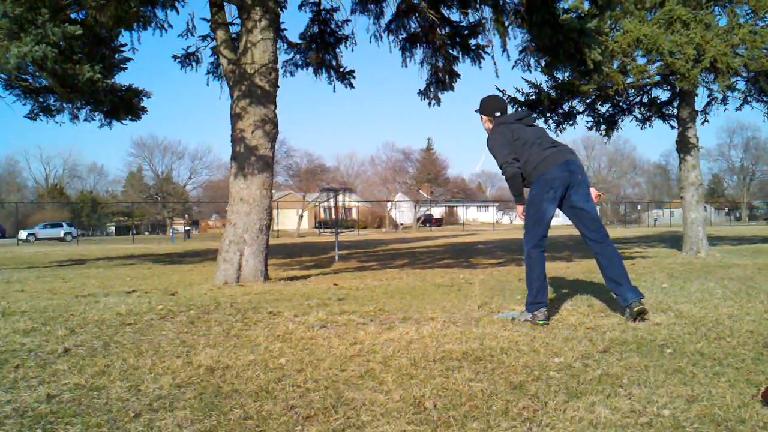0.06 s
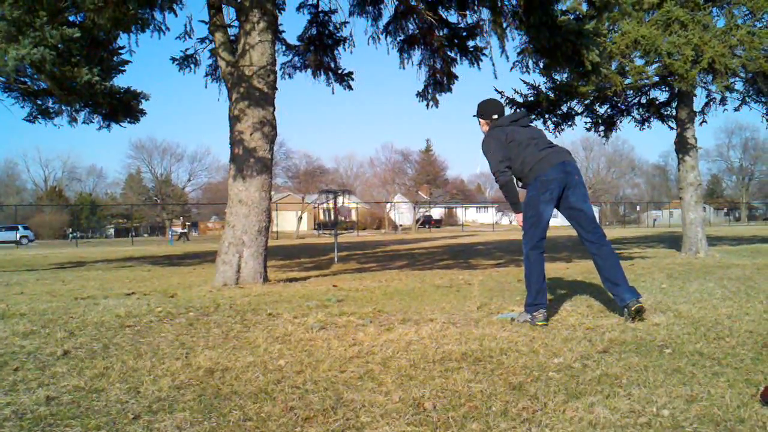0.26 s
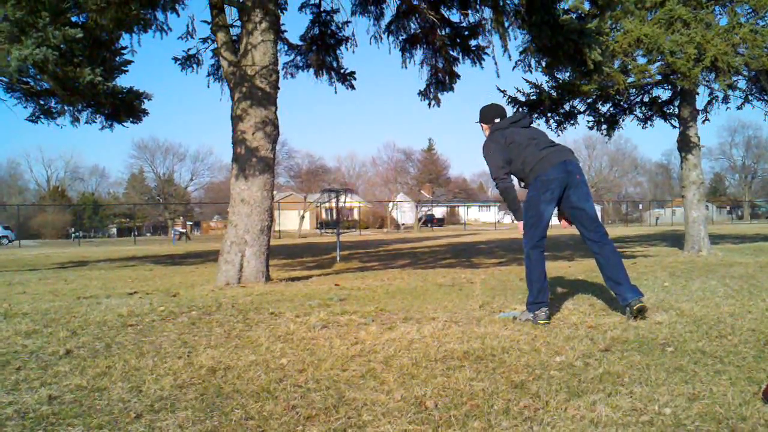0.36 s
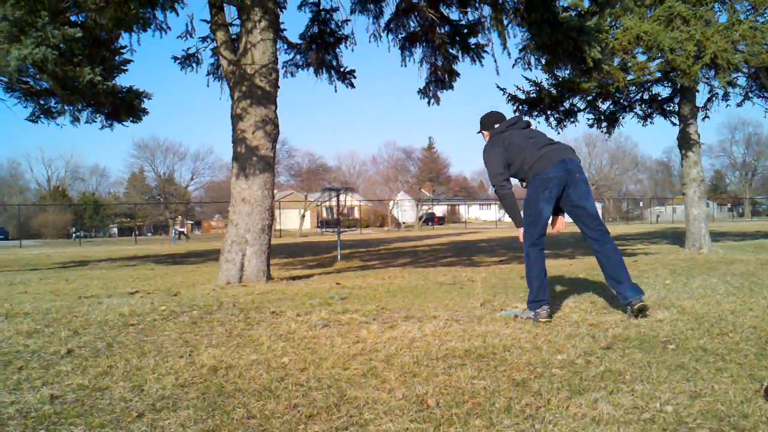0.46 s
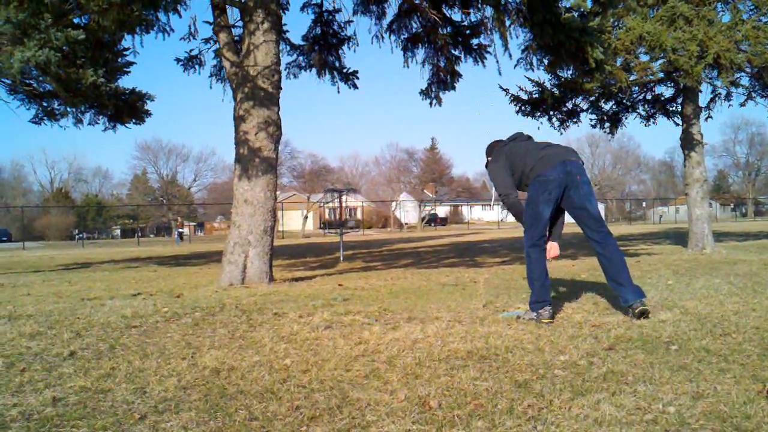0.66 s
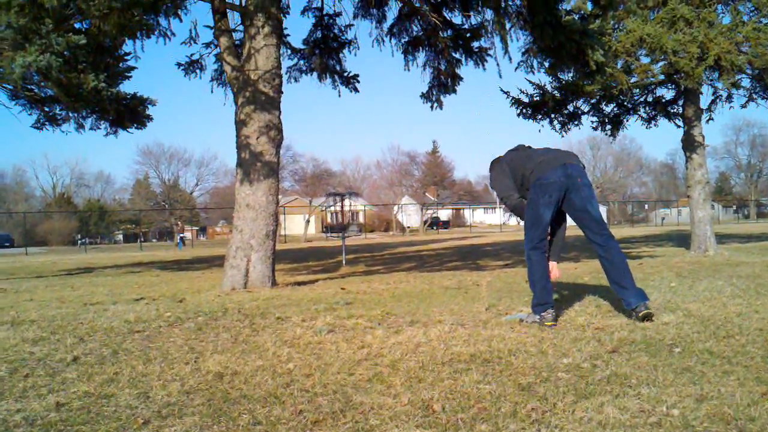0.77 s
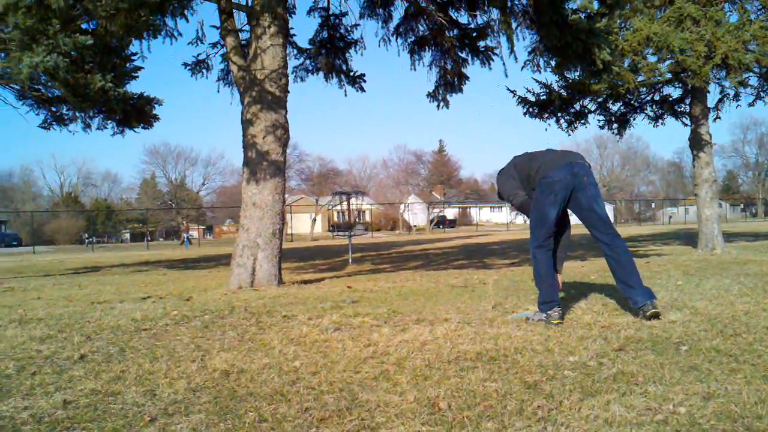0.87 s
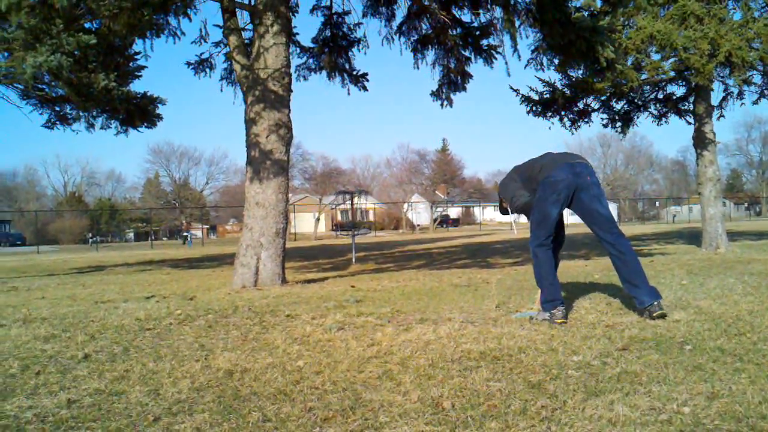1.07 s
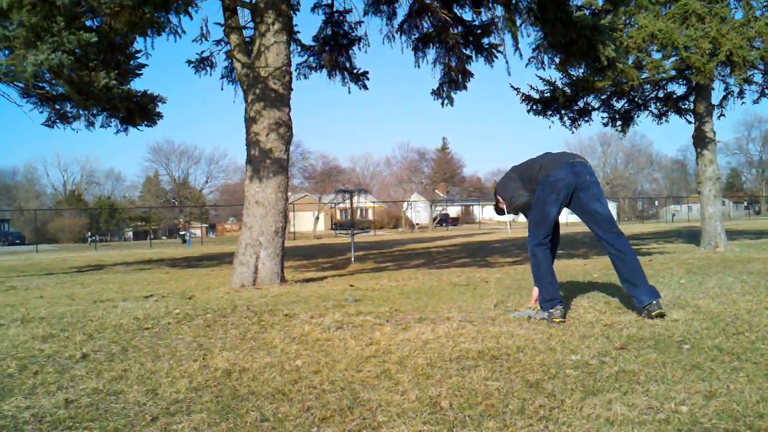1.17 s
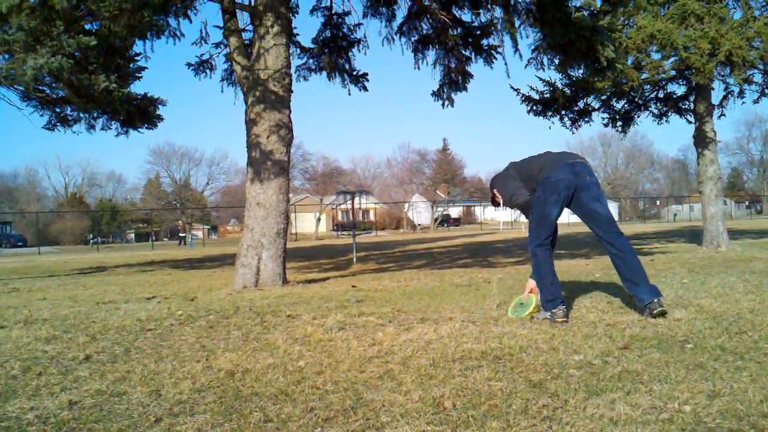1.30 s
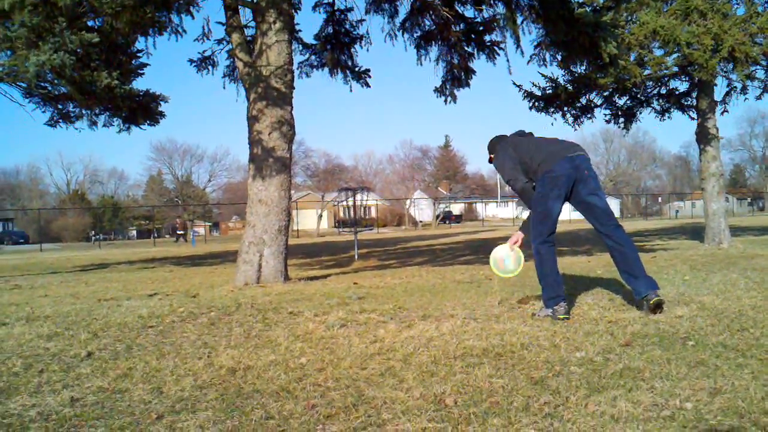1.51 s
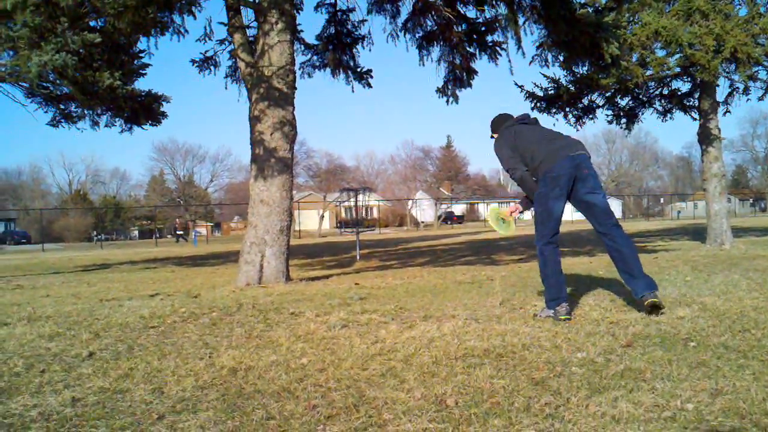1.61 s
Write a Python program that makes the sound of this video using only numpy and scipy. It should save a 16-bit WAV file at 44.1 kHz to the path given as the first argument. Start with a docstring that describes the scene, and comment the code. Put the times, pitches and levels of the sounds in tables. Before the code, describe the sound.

A plastic disc hits metal basket chains with a bright, fading jingle.

```python
"""Disc into a chain basket

An open park, with the basket in front of a stereo microphone. A putted plastic disc hits the hanging
chains and drops into the tray. The steel links clash and ring very high, in surges that die away as
the chains swing out; the basket's wires sing one clear note. Far traffic, low wind, a few dull thumps
and one footfall on the grass lie underneath."""
import sys
import numpy as np
from scipy import signal
from scipy.fft import rfft, irfft
from scipy.io import wavfile

SR = 44100
rng = np.random.default_rng(int(sys.argv[2]) if len(sys.argv) > 2 else 0)


def unload_audio(sound):
    """Save the sound as a 16-bit wav file, at the path given as the first command line argument."""
    columns = np.transpose(np.atleast_2d(sound))
    # keep every value between -1 and 1, then stretch to whole-number steps
    steps = np.round(np.clip(columns, -1, 1) * 32767)
    wavfile.write(sys.argv[1], SR, steps.astype(np.int16))


N = 72765
TIME = np.arange(N) / SR

# far traffic: frequency_hz, density_db_per_hz
TRAFFIC_SPECTRUM = [(200, -95), (480, -86.5), (720, -86), (900, -76), (1060, -83), (1250, -78.5),
                    (1550, -88.5), (1900, -85.5), (2300, -105), (3400, -100), (5200, -110), (14000, -111)]
# its slow swell: time_s, gain_db
TRAFFIC_SWELL = [(0, -3.5), (0.5, -1), (0.9, -0.2), (1.2, 0), (1.4, -0.6), (1.65, -2.7)]
# wind rumble: frequency_hz, density_db_per_hz
RUMBLE_SPECTRUM = [(20, -65), (42, -63), (70, -67), (120, -54), (170, -74.5), (260, -94), (500, -105)]
# gusts in the rumble: time_s, gain_db
GUSTS = [(0, -19), (0.3, -16.5), (0.7, -17.5), (0.93, -16.5), (1.08, -9), (1.2, -5.5), (1.36, -11),
         (1.5, -9), (1.65, -5.5)]
# breeze on either side of the microphone: frequency_hz, left_db_per_hz, right_db_per_hz
BREEZE_SPECTRUM = [(31.2, -106, -123), (73, -91.5, -80), (144, -74.5, -79.5), (208.5, -73.5, -79.5),
                   (317, -81, -86), (660, -81, -89.5), (900, -93, -118), (1250, -100.5, -100),
                   (1998, -88.5, -93.5), (2500, -105, -105), (3380, -102, -102), (4440, -110, -110),
                   (14000, -110, -110)]
# a soft footfall on grass: frequency_hz, density_db_per_hz
FOOTFALL_SPECTRUM = [(90, -84), (230, -67), (400, -75), (800, -80), (1500, -100), (3300, -95), (6000, -108),
                     (14000, -118)]
# soft low thumps: start_s, level_db, pitch_hz
THUMPS = [(0.796, -42, 110), (0.921, -42, 235), (1.158, -39, 174), (1.228, -39.5, 124), (1.478, -30, 135),
          (1.548, -33, 96)]
# modes of the basket's wires: pitch_hz, gain_db, t60_s
BASKET_MODES = [(4360, 0, .165), (4315, -17, .07), (4440, -15, .07), (4530, -19, .05)]
# chains and disc rub the wires: start_s, level_db, length_s
BASKET_RUBS = [(0.262, -46, .012), (0.281, -45, .012), (0.319, -38, .011), (0.37, -54, .02),
               (0.43, -54, .02), (0.475, -55, .02), (0.52, -56, .02), (0.585, -55, .012),
               (0.639, -36, .019), (0.73, -56, .02), (0.785, -56, .02), (1.108, -65, .018),
               (1.318, -66, .02)]
# steady jingle of the swinging chains: time_s, ring_db, clash_db
CHAIN_SWING = [(0.236, -99, -98), (0.25, -35.5, -41), (0.335, -30.5, -46.5), (0.395, -48, -53),
               (0.47, -40.5, -56), (0.54, -45, -59), (0.63, -50.5, -64), (0.68, -42.5, -53.5),
               (0.785, -41, -52.5), (0.88, -60, -63.5), (1.11, -68, -78), (1.24, -64.5, -76.5),
               (1.38, -56.5, -60.5), (1.52, -78, -88), (1.65, -59, -88)]
# strands swing into each other: start_s, ring_db, clash_db, hold_s, t60_s
CHAIN_SURGES = [(0.243, -31, -41, 0.0026, 0.014), (0.261, -37, -49, 0.014, 0.12),
                (0.292, -29, -61, 0.0033, 0.061), (0.324, -45, -69, .010, .09),
                (0.42, -39, -52, 0.0079, 0.038), (0.562, -44, -56.5, 0.021, 0.24),
                (0.634, -36.5, -51, 0.023, 0.08), (0.721, -42, -66, 0.02, 0.15),
                (0.816, -46, -77, 0.037, 0.15), (0.9, -49, -69, 0.0058, 0.079),
                (0.925, -48, -88, 0.01, 0.043), (0.97, -48, -75, 0.0058, 0.052),
                (0.996, -52.5, -76, 0.004, 0.18), (1.042, -49, -86, 0.012, 0.11),
                (1.082, -49, -64.5, 0.012, 0.18), (1.169, -51.5, -66, 0.0074, 0.081),
                (1.286, -54, -87, 0.026, .10), (1.309, -46.5, -77, 0.024, 0.13),
                (1.326, -82, -60, 0.03, 0.12), (1.46, -56, -79, .006, 0.06), (1.61, -61.5, -88, .015, .15)]
# colour of steel touching steel: frequency_hz, gain_db
CLASH_SPECTRUM = [(500, 0), (1300, 10.5), (2000, -2.5), (3400, -0.5), (4000, -2), (4500, 1), (5100, -2),
                  (6400, -4.5), (7500, 2.5), (8600, -2.5), (9700, -12), (10550, 5.5), (11300, -16),
                  (14000, -42)]
# band in which the many links ring: frequency_hz, gain_db
LINK_BAND = [(11800, -18), (12100, -3.5), (12400, -1.5), (12600, -1.5), (12800, -1), (13050, -1),
             (13280, -7), (13500, -5), (13750, -2), (13930, -2)]
# links that hang free and ring longer: pitch_hz, gain_db, t60_s
FREE_LINK_MODES = [(12134, 0, .35), (12225, -7, .25), (13154, -2, .25), (13620, -3, .15), (13790, 2, .18),
                   (13910, 4, .18)]
# single links ring out: start_s, level_db, pitch_hz, t60_s
CLINKS = [(0.304, -28, 12134, .06), (0.325, -29, 13790, .035), (0.425, -40, 13760, .07),
          (0.462, -40, 12900, .07), (0.637, -38, 12134, .08), (0.726, -39, 13900, .06),
          (0.75, -43, 12134, .12), (0.84, -44, 13620, .07), (0.93, -48, 13900, .09),
          (0.975, -48, 13200, .06), (1.052, -47, 13910, .07), (1.092, -46, 13830, .08),
          (1.325, -44, 13910, .09)]
# strands slap the steel: start_s, level_db
SLAPS = [(0.2415, -41), (0.2455, -34), (0.2505, -35), (0.260, -35), (0.2935, -40), (0.3255, -39),
         (0.329, -38), (0.334, -35), (0.3485, -40), (0.4404, -44), (0.5027, -47), (0.637, -45),
         (1.374, -47)]
# colour of a slap: frequency_hz, gain_db
SLAP_SPECTRUM = [(2000, -25), (3300, -4), (4400, 1), (5200, -7), (6500, -2), (9000, -5), (14000, -20)]
# modes of the plastic disc: pitch_hz, gain_db, t60_s
DISC_MODES = [(1274, -12, .022), (1423, -11, .028), (1548, -17, .07), (3210, -7, .013), (3600, -9, .0044)]
# the disc lands on chains and basket: start_s, knock_db, crack_db
DISC_BLOWS = [(0.2452, -21.5, -14), (0.2512, -38, -20), (0.2625, -30, -34), (0.3475, -39, -48),
              (0.3685, -36, -50), (0.6365, -50, -40)]


def from_db(db):
    """Decibels to gain."""
    return 10 ** (np.asarray(db) / 20)


def decay(age, t60):
    """Full level until age 0, then a fall of 60 dB every t60 seconds."""
    return from_db(-60 * np.maximum(age, 0) / t60)


def gain_curves(rows):
    """A gain for every sample, from each dB column of a timed table."""
    times, *columns = np.transpose(rows)
    return from_db([np.interp(TIME, times, column) for column in columns])


def db_at(spectrum, hz, column=1):
    """A spectrum read on a log-frequency axis."""
    points = np.array(spectrum)
    return np.interp(np.log(hz + 1), np.log(points[:, 0]), points[:, column])


def bins():
    """Frequencies of the padded spectrum."""
    return np.arange(N + 1) * SR / (2 * N)


def filtered(x, gain):
    """Filter by a gain for every frequency."""
    return irfft(rfft(x, 2 * N) * gain)[..., :N]


def noise(spectrum, column=1):
    """Noise with a spectrum in dB per Hz."""
    white = rng.standard_normal(N) * np.sqrt(SR / 2)
    return filtered(white, from_db(db_at(spectrum, bins(), column)))


def ring(drive, hz, t60):
    """One mode; a unit click leaves a dying sine of height 1."""
    radius, angle = from_db(-60 / (t60 * SR)), 2 * np.pi * hz / SR
    return signal.lfilter([0, np.sin(angle)], [1, -2 * radius * np.cos(angle), radius ** 2], drive + 1e-18)


def contacts(per_s, spread_db=2.5):
    """Steel touches steel in random clicks of uneven size; rms 1."""
    sizes = from_db(spread_db * np.minimum(rng.exponential(1, N), 4)) * rng.choice([-1, 1], N)
    clicks = sizes * (rng.random(N) < per_s / SR)
    return clicks / (clicks.std() + 1e-9)


def jostle(depth_db=4, per_s=35):
    """A link is jostled now more, now less: a wandering gain of rms 1."""
    knots = np.minimum(rng.standard_normal(int(N / SR * per_s) + 2), 1.5)
    gain = from_db(depth_db * np.interp(TIME * per_s, np.arange(len(knots)), knots))
    return gain / np.sqrt(np.mean(gain ** 2))


def jingle(modes, effort, per_s):
    """Every mode is struck by its own contacts; the rms follows the effort."""
    out, power = 0, 0
    for hz, db, t60 in modes:
        unit_gain = np.sqrt(4 * np.log(1000) / (t60 * SR))
        drive = effort * jostle() * contacts(per_s)
        out += from_db(db) * unit_gain * ring(drive, hz, t60)
        power += from_db(db) ** 2
    return out / np.sqrt(power)


def outdoors(x, scatter_db, t60=.026):
    """Direct sound reaches the microphone with a short scatter of echoes, different on each side."""
    tail = rng.standard_normal((2, N // 8)) * decay(TIME[:N // 8], t60)
    tail /= np.sqrt(np.sum(tail ** 2, axis=1, keepdims=True))
    echoes = signal.fftconvolve(x[None], tail)[:, :N]
    wet = from_db(scatter_db)
    return (x + wet * echoes) / np.sqrt(1 + wet ** 2)


def traffic():
    """Far traffic swells and eases."""
    return gain_curves(TRAFFIC_SWELL) * noise(TRAFFIC_SPECTRUM)


def wind():
    """A gusting rumble, with a separate light breeze on each side of the microphone."""
    rumble = gain_curves(GUSTS) * noise(RUMBLE_SPECTRUM)
    breeze = np.array([noise(BREEZE_SPECTRUM, column) for column in (1, 2)])
    return rumble + breeze


def footfall(peak_s=.926, width_s=.014):
    """One soft step scuffs the grass, off to the left."""
    swell = np.exp(-.5 * ((TIME - peak_s) / width_s) ** 2)
    return swell * noise(FOOTFALL_SPECTRUM) * from_db([[3], [-5]])


def thumps(rise_s=.0045):
    """Dull bumps of a few cycles each."""
    out = np.zeros(N)
    for start, db, hz in THUMPS:
        age = np.maximum(TIME - start, 0)
        envelope = age / rise_s * np.exp(1 - age / rise_s)
        out += from_db(db) * envelope * np.sin(2 * np.pi * hz * age)
    return out


def basket(effort, sympathy_db=-9, pan_db=3.5):
    """Just left of centre, rubbed wires swell and ring out; the clatter keeps them faintly alive."""
    wires = from_db(sympathy_db) * jingle(BASKET_MODES, effort, per_s=210)
    for start, db, length in BASKET_RUBS:
        age = TIME - start
        for hz, mode_db, t60 in BASKET_MODES:
            envelope = from_db(db + mode_db) * np.clip(age / length, 0, 1) * decay(age - length, t60)
            wires += np.sqrt(2) * envelope * np.sin(2 * np.pi * (hz * age + rng.random()))
    return outdoors(wires, scatter_db=-15) * from_db([[pan_db / 2], [-pan_db / 2]])


def chain_motion(rise_s=.004):
    """Strength of ringing and of clashing: the swing plus surges that rise, hold and die."""
    power = gain_curves(CHAIN_SWING) ** 2
    for start, ring_db, clash_db, hold, t60 in CHAIN_SURGES:
        age = TIME - start
        envelope = np.clip(age / rise_s + .5, 0, 1) * decay(age - hold, t60)
        power += (from_db([[ring_db], [clash_db]]) * envelope) ** 2
    return np.sqrt(power)


def clashes(effort, count=64, band_hz=(3044, 11754), t60=.05, diffuse_db=-5, tick_db=-1.5, overtone_db=2):
    """Link ticks against link, partly from all around, and wakes the steel's short lower overtones."""
    colour = from_db(db_at(CLASH_SPECTRUM, bins()))
    direct, left, right = (filtered(effort * contacts(per_s=1100), colour) for _ in range(3))
    ticks = direct + from_db(diffuse_db) * np.array([left, right])
    pitches = np.linspace(*band_hz, count) + rng.normal(0, 77.5, count)
    modes = [(hz, db_at(CLASH_SPECTRUM, hz), t60) for hz in pitches]
    overtones = outdoors(jingle(modes, effort, per_s=190), scatter_db=-10.5)
    return from_db(tick_db) * ticks + from_db(overtone_db) * overtones


def links(effort, count=44, t60=.04, diffuse_db=-8, damped_db=-1, free_db=-8):
    """Many slightly unlike links ring briefly, partly from all around; a few hang free and ring on."""
    pitches = np.linspace(LINK_BAND[0][0], LINK_BAND[-1][0], count) + rng.normal(0, 7.1, count)
    modes = [(hz, db_at(LINK_BAND, hz), t60) for hz in pitches]
    direct, left, right = (jingle(modes, effort, per_s=140) for _ in range(3))
    damped = direct + from_db(diffuse_db) * np.array([left, right])
    free = jingle(FREE_LINK_MODES, effort, per_s=80)
    return from_db(damped_db) * damped + from_db(free_db) * free


def clinks(rise_s=.003, twin_db=-7, beat_range_hz=(66, 154)):
    """One link rings out above the rest, with two close modes that beat."""
    out = np.zeros(N)
    for start, db, hz, t60 in CLINKS:
        age = np.maximum(TIME - start, 0)
        envelope = from_db(db) * np.minimum(age / rise_s, 1) * decay(age - rise_s, t60)
        twin_hz = hz - rng.uniform(*beat_range_hz)
        twin = from_db(twin_db) * np.sin(2 * np.pi * (twin_hz * age + rng.random()))
        out += envelope * (np.sin(2 * np.pi * hz * age) + twin)
    return out


def slaps(t60=.018):
    """A taut strand slaps the steel: a hard tick that is gone at once."""
    envelope = sum((TIME >= start) * from_db(db) * decay(TIME - start, t60) for start, db in SLAPS)
    grit = noise(SLAP_SPECTRUM)
    return envelope * grit / grit.std()


def disc(low_cut_hz=1000):
    """The light plastic disc cracks against the steel and knocks dryly, with little bass."""
    knocks, cracks = np.zeros((2, N))
    for start, knock_db, crack_db in DISC_BLOWS:
        at = int(start * SR)
        knocks[at], cracks[at] = from_db([knock_db, crack_db])
    body = sum(from_db(db) * ring(knocks, hz, t60) for hz, db, t60 in DISC_MODES)
    low_cut = signal.butter(4, low_cut_hz, "high", fs=SR, output="sos")
    return signal.sosfilt(low_cut, cracks + body)


def scene():
    """Disc, chains and basket in the foreground, the open park behind."""
    ringing, clashing = chain_motion()
    putt = disc() + slaps() + clinks() + links(ringing) + clashes(clashing) + basket(clashing)
    return putt + traffic() + wind() + footfall() + thumps()


def record(dry):
    """The microphone's right channel is inverted and slightly late; both sides lose the top steeply."""
    right_lag_s, cutoff_hz = .000385, 13970
    hz = bins()
    right = -filtered(dry[1], np.exp(-2j * np.pi * hz * right_lag_s))
    high_cut = 1 / np.sqrt(1 + (hz / cutoff_hz) ** 600)
    return filtered(np.array([dry[0], right]), high_cut)


dry = scene()
out = record(dry)
unload_audio(out)
```